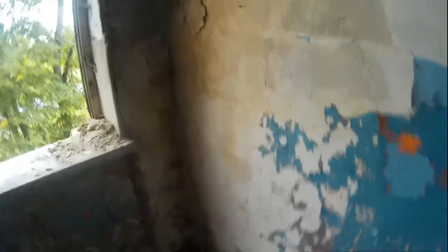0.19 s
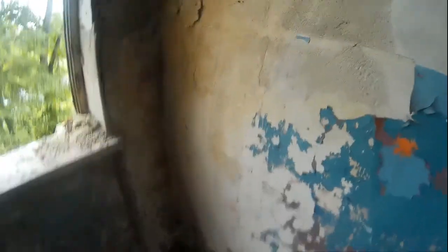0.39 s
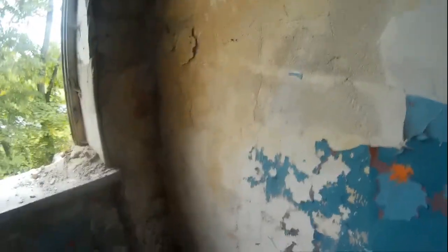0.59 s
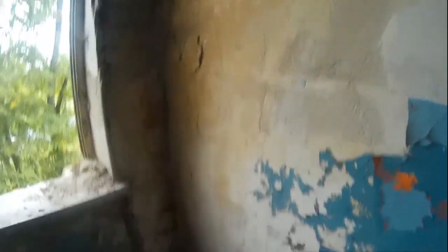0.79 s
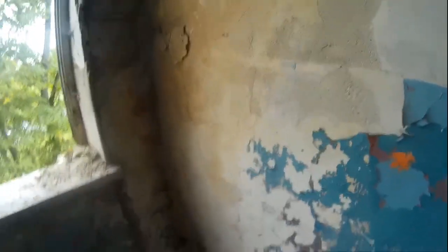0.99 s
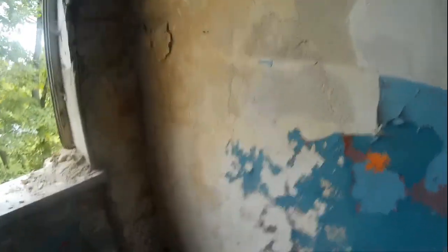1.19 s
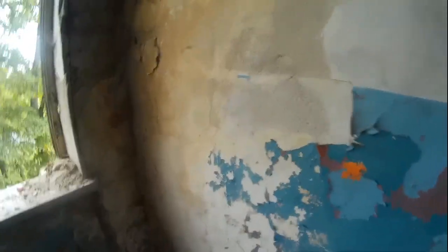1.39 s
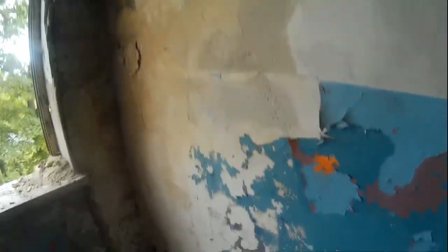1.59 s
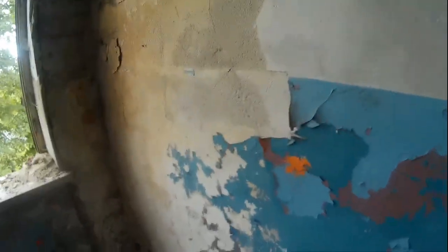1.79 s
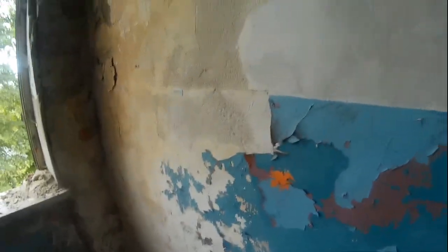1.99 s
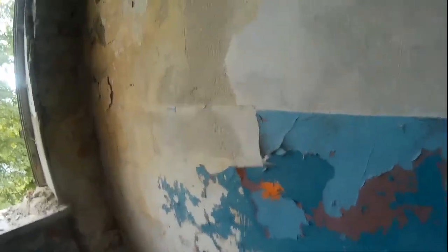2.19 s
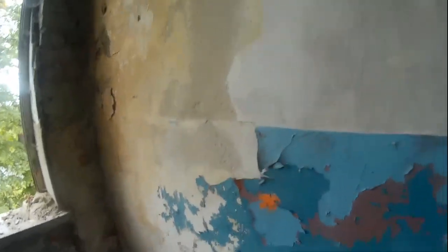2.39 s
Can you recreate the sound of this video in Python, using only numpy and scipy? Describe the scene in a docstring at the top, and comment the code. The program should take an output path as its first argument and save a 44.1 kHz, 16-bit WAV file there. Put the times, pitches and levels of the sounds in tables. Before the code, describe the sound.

Slow steps on loose rubble in an empty hard-walled room, picked up by a moving hand-held microphone: dull knock, hard snap, gravelly crunches, a harsh scrape that rings metallic, then quiet gritty rubbing over faint rumble and hiss.

```python
"""Slow steps over plaster and brick debris in a bare room, heard from a hand-held camera.
Soles and gear rub in short gritty swells made of tiny random slips; chips tick, and damped modes
knock dully under the weight. One hard crack of gliding modes overloads the microphone; bright scrapes
use the same slips, and a small piece of metal rings as decaying sines. A short noise tail is the room;
beneath lie still air and a rumble, hiss and pulsing whine that grow with movement."""
import sys
import numpy as np
from scipy import signal
from scipy.io import wavfile
from scipy.ndimage import uniform_filter1d

SR = 44100
rng = np.random.default_rng(int(sys.argv[2]) if len(sys.argv) > 2 else 0)


def wav_out(sig):
    """Save sig, one row per channel (or a flat mono array), as 16-bit PCM at SR to the path in sys.argv[1]."""
    wavfile.write(sys.argv[1], SR, np.round(np.clip(np.atleast_2d(sig).T, -1, 1) * 32767).astype(np.int16))


N = 105840  # length in samples, 2.4 s
TIME = np.arange(N) / SR  # s

# Tone of debris under soles and gear. Each row: frequency in Hz, gain in dB.
DEBRIS_COLOUR = [(30, -14.5), (100, -9), (145, -5.5), (215, -3.5), (310, -8), (440, 4.5), (590, -11),
                 (800, -5.5), (956, -12.5), (1110, -4.5), (1320, -3), (1650, -17.5), (1950, -15),
                 (2450, -27.5), (3400, -36), (3820, -35.5), (4200, -38), (6000, -49.5), (8000, -60),
                 (15000, -62.5)]


def amp(db):
    """Turns decibels into gain."""
    return 10 ** (np.asarray(db) / 20)


def unit(x):
    """Scales a sound to rms 1."""
    return x / np.sqrt(np.mean(x ** 2) + 1e-20)


def read(points, hz):
    """Reads a table of values against frequency, on a log-frequency axis."""
    f, value = np.transpose(points)
    return np.interp(np.log(hz + 1), np.log(f + 1), value)


def colour(x, points, low_db=0, grit_db=0, size=4096):
    """Causal minimum-phase filter from a spectrum, with more or less low body and grit."""
    hz = abs(np.fft.fftfreq(size, 1 / SR))

    def below(corner_hz):
        return 1 / (1 + (hz / corner_hz) ** 6)

    body = below(780)
    grit = below(6500) - below(1600)
    log_gain = np.log(amp(read(points, hz) + low_db * body + grit_db * grit))
    # the Hilbert transform of the log gain gives the phase of a filter that never sounds early
    spectrum = np.exp(np.conj(signal.hilbert(log_gain)))
    taps = np.fft.ifft(spectrum).real[:size // 2]
    return signal.fftconvolve(x, taps)[:len(x)]


def add(mix, s, sound):
    """Mixes a sound in at a time in seconds, trimming what falls outside."""
    at = round(s * SR)
    sound = sound[max(-at, 0):]
    part = mix[max(at, 0):][:len(sound)]
    part += sound[:len(part)]


def ring(hz, swell, glide_hz=0, size=4096):
    """A damped mode that peaks after swell seconds and dies, its pitch settling from above."""
    glide_s = 0.0012  # time constant of the pitch drop
    t = np.arange(size) / SR
    u = t / max(swell, 1e-4)
    envelope = (u * np.exp(1 - u)) ** 3
    turns = np.cumsum(hz + glide_hz * np.exp(-t / glide_s)) / SR
    return envelope * np.sin(2 * np.pi * turns)


def friction(points, peak, rise, fall, level_db, low_db=0, grit_db=0):
    """A swell of tiny uneven slips, coloured by what they shake; returns start time and sound."""
    slips_per_s, slip_spread_db = 3000, 3
    swell_shape = 1.23  # above 1 rounds the top of a swell
    t = TIME[:SR // 2] - 1 / 4  # zero at the peak
    span = np.maximum(-t / max(rise, 1e-3), t / max(fall, 1e-3))
    force = 10 ** -(span ** swell_shape)  # 20 dB down after one rise or fall time
    chance, size, sign = rng.random((3, len(t)))
    size = np.minimum(-np.log(1 - size), 3)  # many small slips, few large
    slips = (chance < slips_per_s / SR) * amp(slip_spread_db * size) * np.sign(sign - .5)
    sound = colour(slips * force, points, low_db, grit_db)
    force_rms = np.sqrt(np.mean(force ** 2))
    return peak + t[0], amp(level_db) * unit(sound) * force_rms


def background(motion):
    """Steady air noise, with rumble, faint cloth hiss and a pulsing whine following movement."""
    # Spectra of the still air, the rumble of the moving camera and the cloth hiss.
    # Each row: frequency in Hz, relative gain in dB.
    air_colour = [(20, 5), (45, -6), (100, -6.5), (250, -13), (430, -9), (650, -17), (1300, -18),
                  (1700, -22.5), (2600, -28), (8500, -37), (15500, -36)]
    sway_colour = [(10, -5), (28, 1), (45, -0.5), (80, -14), (160, -29), (600, -78)]
    hiss_colour = [(1500, -31.5), (4000, -4), (8000, 1), (9700, -0.5), (12000, -2.5), (15500, -7)]
    air_db, sway_db, hiss_db, whine_db = -57, -52.5, -73.5, -76.5  # rms over the whole scene
    sway_follow, hiss_follow = .4, 0.27  # powers of the movement level
    hiss_lag_s = .03
    whine_hz, pulse_hz = 9525, 36.5
    pulse_depth, wobble_rad = .55, 1.1

    air, sway, hiss = rng.standard_normal((3, N))
    effort = np.sqrt(abs(uniform_filter1d(motion ** 2, size=4000)) + 1e-7)
    capped_effort = np.minimum(effort, amp(-37))
    late_effort = np.interp(TIME - hiss_lag_s, TIME, capped_effort)
    hiss_swell = late_effort ** hiss_follow

    pulse = np.sin(2 * np.pi * pulse_hz * TIME)
    whine = np.sin(2 * np.pi * whine_hz * TIME + wobble_rad * pulse) * (1 + pulse_depth * pulse)

    air = amp(air_db) * unit(colour(air, air_colour))
    rumble = amp(sway_db) * unit(colour(sway * effort ** sway_follow, sway_colour))
    hiss = amp(hiss_db) * unit(colour(hiss * hiss_swell, hiss_colour))
    whine = amp(whine_db) * unit(whine * hiss_swell)
    return air + rumble + hiss + whine


def metal():
    """A small piece of metal rings on when jolted: a few sine modes, each dying at its own rate."""
    # Modes of the piece. Each row: frequency in Hz, relative level in dB, time to fall 60 dB in seconds.
    metal_modes = [(1360, -61, 0.28), (1950, -59.5, .28), (2206, -44.5, .47), (3160, -67.5, 0.246)]
    # Jolts. Each row: start in seconds, gain on all modes in dB.
    jolts = [(0.0, -19.5), (1.421, -1.5)]
    out, t = np.zeros(N), TIME[:SR]
    tone = np.zeros(len(t))
    for hz, db, t60 in metal_modes:
        decay = np.exp(-np.log(1000) * t / t60)
        tone += amp(db) * decay * np.sin(2 * np.pi * hz * t)
    for s, db in jolts:
        add(out, s, amp(db) * tone)
    return out


def rubs():
    """Debris crunches and gear rubs as swells of friction slips."""
    # Each row: peak in seconds, rise and fall over 20 dB in seconds, level in dB,
    # low body in dB, grit in dB.
    swells = [(0.004, 0.031, 0.034, -45.5, 9.5, 11.5), (0.140, 0.057, 0.053, -49, 5.5, 8.5),
              (0.191, 0.052, 0.037, -47, 2, -6), (0.241, .03, 0.035, -28, 0, -8),
              (0.300, 0.037, 0.039, -41.5, -7.5, -2.5), (0.336, 0.018, 0.033, -29, -15.5, 4),
              (0.406, 0.041, 0.052, -47.5, 4, -1), (0.458, 0.018, 0.022, -37.5, 7.5, -7),
              (0.480, 0.053, 0.044, -38.5, -1.5, -2.5), (0.57, 0.026, 0.02, -36.5, 0, -4),
              (0.606, 0.018, 0.017, -25, 9.5, 4.5), (0.618, 0.011, 0.012, -29, -4.5, 3),
              (0.657, 0.028, 0.038, -26.5, -5, 1), (0.712, 0.025, 0.073, -47.5, -10, 8),
              (0.785, 0.045, 0.041, -48.5, -2, 2.5), (0.849, 0.062, 0.057, -50, 2.5, -2),
              (0.927, 0.093, 0.064, -42.5, -5.5, -2), (0.961, 0.02, 0.022, -45, 6, 5.5),
              (1.062, 0.081, 0.039, -48, 0, 3), (1.109, 0.018, 0.034, -30.5, 3, -0.5),
              (1.136, 0.05, 0.03, -32.5, 4.5, -5.5), (1.167, 0.034, 0.017, -35.5, -2.5, -2),
              (1.314, 0.05, 0.064, -46, 1.5, -8.5), (1.349, 0.058, 0.04, -41.5, 8, 4),
              (1.394, 0.033, 0.066, -30, -5, -5), (1.447, 0.037, 0.026, -26.5, -8.5, 2.5),
              (1.469, 0.0083, 0.0058, -37, -1, 2.5), (1.505, .012, 0.048, -52.5, -10, -5.5),
              (1.681, 0.05, 0.02, -43.5, 5, 5), (1.740, 0.027, 0.068, -41, 1.5, -1.5),
              (1.786, 0.12, 0.062, -37, 1.5, 3), (1.845, 0.074, 0.1, -49, 0, 6),
              (1.892, 0.025, 0.063, -40, 5, 2.5), (1.920, 0.026, 0.033, -43, 11.5, 16),
              (1.945, 0.03, 0.012, -45, -2.5, 4), (2.147, 0.041, 0.053, -38.5, 3, -13),
              (2.192, 0.056, 0.075, -34, -3.5, -7.5), (2.269, 0.023, 0.02, -37, 1, -15.5)]
    out = np.zeros(N)
    for row in swells:
        add(out, *friction(DEBRIS_COLOUR, *row))
    return out


def ticks():
    """Small chips shift in very short bursts of slips, thin in body and grit."""
    # Each row: peak in seconds, level in dB.
    chips = [(0.025, -42), (0.2393, -26), (0.2502, -25.5), (1.0531, -39), (1.5056, -42), (1.8900, -38.5),
             (1.946, -42.5), (2.1110, -46), (2.1452, -39.5), (2.1790, -34.5)]
    rise_s, fall_s, low_db, grit_db = 0.0017, 0.0074, -10.5, -8.5
    out = np.zeros(N)
    for s, db in chips:
        add(out, *friction(DEBRIS_COLOUR, s, rise_s, fall_s, db, low_db, grit_db))
    return out


def knocks():
    """The weight comes down in dull knocks, each one heavily damped mode."""
    # Each row: start in seconds, peak level in dB, pitch in Hz, swell to the peak in seconds.
    thuds = [(0.237, -17.5, 136, 0.0026), (0.2470, -12.5, 315, 0.0022), (0.242, -30.5, 63, 0.018),
             (0.6065, -24.5, 249, 0.0035), (0.6580, -22.5, 492, 0.0038), (0.926, -36, 146.5, 0.0041),
             (1.1150, -33.5, 80, 0.0058), (2.1768, -24.5, 327, 0.002), (2.2700, -35, 157, 0.0031),
             (2.2973, -33.5, 1297, 0.0027)]
    out = np.zeros(N)
    for s, db, hz, swell in thuds:
        add(out, s, amp(db) * ring(hz, swell))
    return out


def snap():
    """A short hard crack of damped modes that start high and drop, with two close reflections."""
    # Modes of the crack. Each row: settled pitch in Hz, relative level in dB, swell in seconds.
    snap_modes = [(694, -12, 0.0016), (1095.5, -1, 0.0016), (1742, -11.5, 0.0015), (3722, -33.5, 0.0024),
                  (4324, -27, 0.0014)]
    # The moment of the snap. Each row: time in seconds, gain in dB.
    hits = [(0.2798, -1)]
    # Close reflections. Each row: delay in seconds, gain in dB.
    echoes = [(.0047, -15.5), (0.0108, -29.5)]
    glide_hz = 859  # how far above its settled pitch each mode starts
    out = np.zeros(N)
    crack = sum(amp(db) * ring(hz, swell, glide_hz) for hz, db, swell in snap_modes)
    for s, db in hits:
        for delay, echo_db in [(0.00023, 0), *echoes]:  # direct sound first
            add(out, s + delay, amp(db + echo_db) * crack)
    return out


def scrapes():
    """Bright gravelly scrapes: friction slips through a harder, brighter colour."""
    # Tone of the scraped surface. Each row: frequency in Hz, gain in dB.
    scrape_colour = [(60, -33), (200, -15.5), (500, -3), (830, -7.5), (1200, -1), (1550, -12), (1900, 4.5),
                     (2150, 3), (2450, -10), (2650, -7), (3000, -17.5), (3400, -18.5), (3800, -3.5),
                     (4200, -25.5), (4800, -27.5), (6200, -29), (7500, -44.5), (11500, -44.5),
                     (15000, -58.5)]
    # Each row: peak in seconds, rise and fall over 20 dB in seconds, level in dB.
    strokes = [(0.657, .02, 0.037, -43.5), (0.712, 0.025, 0.043, -51), (1.408, 0.0065, 0.026, -21.5),
               (1.421, 0.016, 0.014, -16), (1.446, 0.0071, 0.023, -43)]
    out = np.zeros(N)
    for row in strokes:
        add(out, *friction(scrape_colour, *row))
    return out


def room(x):
    """A short diffuse tail from the bare walls: noise that decays at its own rate in each band."""
    # Reverberation. Each row: frequency in Hz, time to fall 60 dB in seconds.
    room_t60 = [(100, 0.55), (1300, 0.35), (4000, .23), (12000, 0.54)]
    noise = rng.standard_normal(SR // 2)
    hz, t, bands = signal.stft(noise, SR, nperseg=256)
    decay = np.exp(-np.log(1000) * t / read(room_t60, hz)[:, None])
    tail = signal.istft(bands * decay, SR, nperseg=256)[1]
    return signal.fftconvolve(x, tail / np.linalg.norm(tail))[:N]


def scene():
    """Steps, scrapes, snap and ringing metal in the room, over the background."""
    room_db, snap_send_db = -19, -3.5
    walk = rubs() + ticks() + knocks() + scrapes()
    crack = snap()
    reverb = amp(room_db) * room(walk + amp(snap_send_db) * crack)
    mix = walk + crack + metal() + reverb + background(walk)
    return mix[None]


def record(dry):
    """The microphone input flattens peaks above its limit; then a steep low-pass limits the band."""
    clip_level, edge_hz = .69, 15800
    clipped = np.clip(dry, -clip_level, clip_level)
    low_pass = signal.firwin(511, edge_hz, window=("kaiser", 9), fs=SR)
    return signal.oaconvolve(clipped, low_pass[None], "same")


dry = scene()
out = record(dry)
wav_out(out)
```